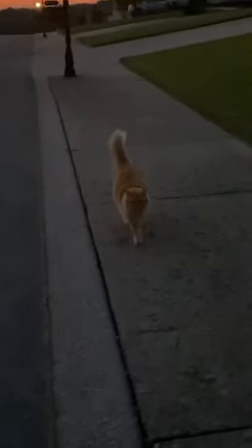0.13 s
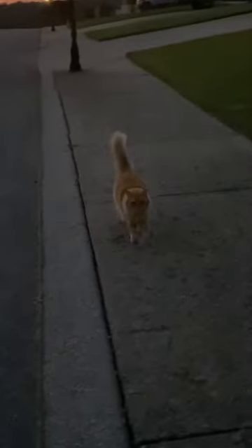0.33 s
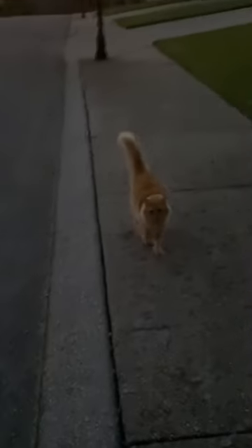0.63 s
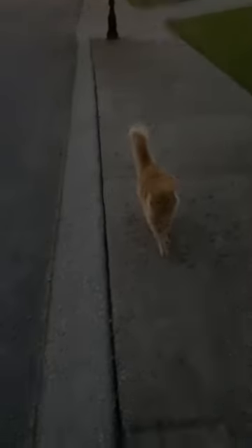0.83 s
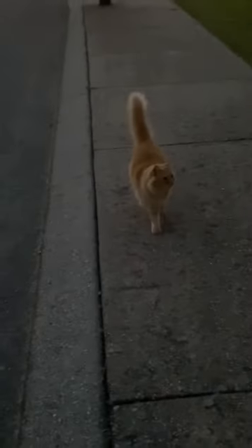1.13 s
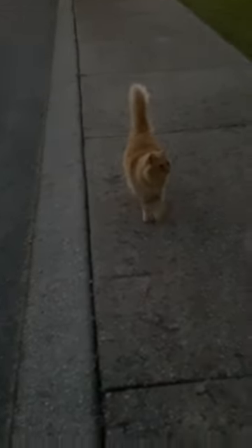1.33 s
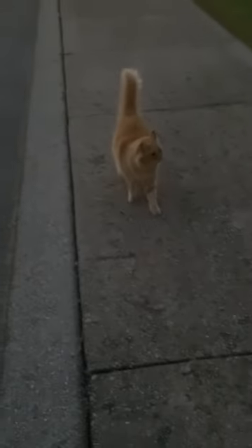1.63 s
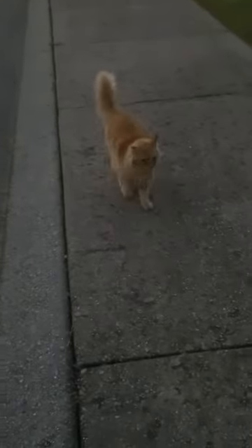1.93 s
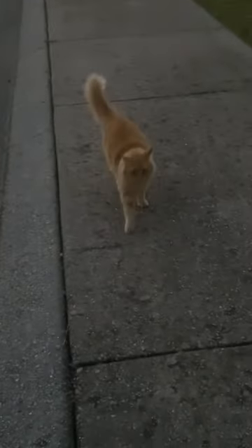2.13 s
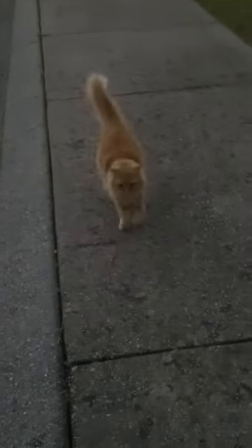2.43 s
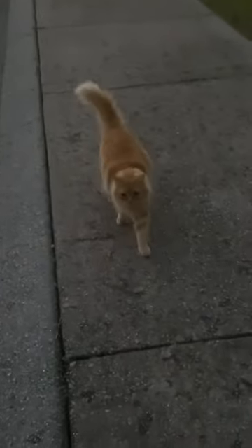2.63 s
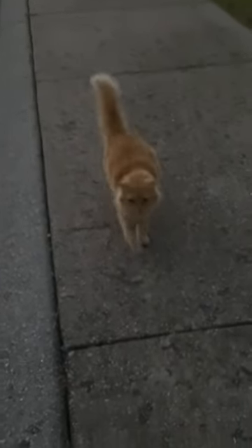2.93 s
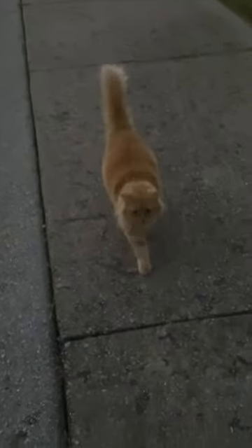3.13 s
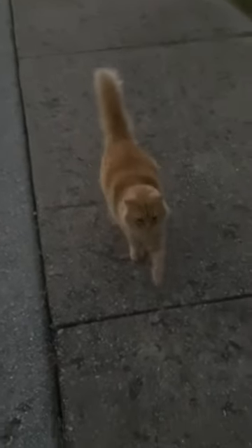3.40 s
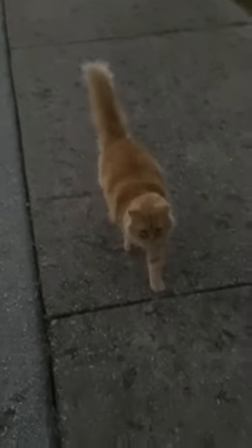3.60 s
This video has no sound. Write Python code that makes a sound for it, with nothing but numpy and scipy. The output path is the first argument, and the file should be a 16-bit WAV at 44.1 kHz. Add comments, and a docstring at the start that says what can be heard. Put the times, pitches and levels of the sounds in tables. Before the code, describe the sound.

On a quiet street, a cat near the microphone meows twice, first briefly, then in a longer call that dulls at the end. Behind it are a low rumble of far traffic, a soft hum and faint high insects.

```python
"""Far traffic rumbles under a mains hum and a steady high insect chorus; two insects rasp in turns.
It is dusk. A cat walks softly up the pavement and meows twice: a short call that rises and falls,
then a long one that closes from "ee-a" to "ow". Its vocal folds make the tone, its moving mouth
shapes the vowels, and the street echoes faintly. A small microphone hears it all through
two openings (ports), one left and one right."""
import sys
import numpy as np
from scipy import signal
from scipy.fft import rfft, irfft
from scipy.io import wavfile

SR = 44100
rng = np.random.default_rng(int(sys.argv[2]) if len(sys.argv) > 2 else 0)


def put_to_file(sound):
    """Save the sound as 16-bit audio at rate SR, in the file named by the first command-line argument."""
    columns = np.atleast_2d(sound).T  # one column per channel
    safe = np.clip(columns, -1, 1)
    whole_steps = np.round(safe * 32767)
    wavfile.write(sys.argv[1], SR, whole_steps.astype(np.int16))


N = 165816
T = np.arange(N) / SR
HZ = np.maximum(np.fft.rfftfreq(N, 1 / SR), 1)

# far traffic, from low to high: f/Hz, level/dB per Hz
TRAFFIC_SPECTRUM = [(20, -97), (32, -84.5), (50, -69), (80, -68.5), (115, -72.5), (160, -75), (220, -74),
                    (290, -80), (400, -84), (560, -92), (750, -102), (1100, -105), (1500, -108),
                    (2000, -114), (3000, -123), (9000, -150)]
# how the traffic rises and falls: t/s, deep rumble gain/dB, upper roar gain/dB
TRAFFIC_GAIN = [(0, -0.5, -2.5), (.7, -1, -1.5), (1.3, 0, 0.5), (1.7, -1, -0.5), (2.2, 0.5, -1.5),
                (2.8, 2, 0.5), (3.3, 1.5, -1), (3.76, 0, 1.5)]
# tones of the mains hum: f/Hz, rms level/dB
HUM_TONES = [(59.5, -63.5), (120, -58.5), (240, -59.5)]
# the insect chorus: f/Hz, level/dB per Hz
CHORUS_SPECTRUM = [(2400, -140), (3100, -123), (3550, -115), (4130, -113), (4450, -123), (5300, -124),
                   (5850, -111), (6300, -105), (6750, -111), (7100, -121), (8100, -123), (8600, -155)]
# air moving at each port: f/Hz, level/dB per Hz
AIR_SPECTRUM = [(30, -102), (70, -96), (170, -102), (400, -95), (700, -105), (1100, -101), (1400, -109),
                (1900, -126), (4000, -132), (8000, -135), (9000, -155)]
# rasps of the higher and the lower insect: start t/s, length/s, level/dB
HIGH_RASPS = [(.06, 0.095, -69.5), (.32, 0.087, -70.5), (.585, 0.094, -74.5), (.87, 0.1, -73.5),
              (1.15, 0.12, -73.5), (1.44, 0.14, -76), (1.77, 0.12, -74.5), (2.05, 0.11, -74),
              (2.33, 0.12, -74.5), (2.61, .11, -74), (2.9, 0.07, -71), (3.19, 0.079, -71),
              (3.48, 0.11, -71)]
LOW_RASPS = [(.09, 0.076, -77), (.37, 0.16, -80), (.6, 0.053, -76), (.8, 0.26, -79), (1.21, 0.084, -81),
             (1.47, 0.2, -80), (1.63, 0.075, -79), (1.84, 0.13, -75), (2.1, 0.091, -85),
             (2.25, 0.14, -76.5), (2.66, .1, -81.5), (2.99, 0.099, -75.5), (3.26, 0.092, -74),
             (3.56, 0.18, -77)]
# paws landing on grit: t/s, level/dB, centre f/Hz, spread/Hz, fade time/s
PAW_STEPS = [(0.459, -80, 3000, 1500, 0.0027), (0.956, -54.5, 800, 376, 0.003),
             (3.68, -68.5, 1510, 1500, 0.041)]
# pitch of each meow: t/s, f/Hz
SHORT_PITCH = [(.688, 556), (.703, 581.5), (.725, 612), (.78, 623), (.825, 643), (.84, 647), (.88, 637),
               (.96, 605.6), (1.0, 587), (1.11, 550)]
LONG_PITCH = [(2.69, 495), (2.728, 551), (2.764, 600.4), (2.862, 610.6), (2.95, 589.7), (3.002, 597),
              (3.1, 581.8), (3.19, 597.1), (3.27, 576), (3.346, 557.4), (3.46, 582.7), (3.526, 562),
              (3.615, 544), (3.64, 607)]
# effort and mouth shape: t/s, level/dB before shaping, first resonance f/Hz, second resonance f/Hz
SHORT_MOUTH = [(0.691, -78, 2065, 3160), (.73, -74.5, 2110, 3550), (.77, -75, 2200, 3400),
               (.84, -69, 2116, 3370), (.91, -72, 2120, 3254), (.98, -76, 1810, 3130),
               (1.019, -87, 1630, 3040), (1.11, -76, 1352, 3000)]
LONG_MOUTH = [(2.691, -87.5, 1037, 2880), (2.73, -74.5, 1640, 2930), (2.78, -72.5, 2050, 3310),
              (2.86, -69.5, 2267, 3295), (2.98, -67.5, 2120, 3200), (3.08, -67, 1940, 2980),
              (3.161, -66, 1750, 2860), (3.23, -67, 1515, 2880), (3.33, -67.5, 1087, 2427),
              (3.45, -67.5, 1089, 2380), (3.51, -77, 1020, 2320), (3.56, -73.5, 970, 2400),
              (3.629, -76, 1000, 2500)]
# tone colour of each meow on its way to the microphone, as the head turns: f/Hz, gain/dB
SHORT_COLOUR = [(620, 5.5), (1250, 0.5), (1900, -5.5), (2500, -7), (3150, -2), (3750, 5), (4400, 10),
                (5200, 24.5), (5800, 22), (6500, 34), (7300, 14.5), (8300, 10), (9500, -7)]
LONG_COLOUR = [(600, 0), (1200, 5), (1800, -9), (2400, 2.5), (3000, -7), (3600, 5), (4250, 12), (4750, 12),
               (5300, 23.5), (6000, 17), (6650, 29.5), (7400, 16.5), (8200, 19.5), (9000, 19.5),
               (11000, 13.5)]
# moments when the voice catches: t/s, width/s, extra wobble/share of the pitch
VOICE_CATCHES = [(0.693, 0.011, .028), (0.837, 0.01, 0.014), (2.948, 0.0033, 0.014), (3.37, 0.055, .004),
                 (3.58, .05, .006)]
# echoes from the street: delay/s, gain/dB
STREET_ECHOES = [(.031, -31), (.074, -19.5), (.128, -39)]
# how far the left port is ahead of the right: f/Hz, phase/rad
PORT_PHASE = [(60, 0), (170, -.07), (300, -.27), (450, -.65), (650, -1.1), (850, -1.0), (1100, -.15),
              (1500, 0), (2000, .1), (2500, 1.05), (3000, .8), (3300, .35), (4200, .6), (4550, 1.3),
              (4870, 3.14), (5200, 6.0), (6000, 6.9), (8000, 7.85)]
# how much louder the left port is than the right: f/Hz, level/dB
PORT_BALANCE = [(100, .1), (200, .4), (350, 1.4), (700, -.5), (1150, -2.2), (1700, -.2), (8000, 0)]


def from_db(db):
    """Turn decibels into a number to multiply by."""
    return 10 ** (np.asarray(db) / 20)


def in_time(rows):
    """Join a table's rows with straight lines: one curve in time for each value column."""
    times, *columns = np.transpose(rows)
    return [np.interp(T, times, column) for column in columns]


def at_hz(points, hz):
    """Read a table at any frequency, with octaves evenly spaced."""
    f, value = np.transpose(points)
    return np.interp(np.log(hz), np.log(f), value)


def band(centre_hz, spread_hz):
    """Noise in a bell-shaped band around one frequency, of typical size (rms) 1."""
    bell = np.exp(-.5 * ((HZ - centre_hz) / spread_hz) ** 2)
    x = irfft(rfft(rng.standard_normal(N)) * bell, N)
    return x / x.std()


def drift(rate_hz):
    """A random wander of typical size 1; a higher rate wanders faster."""
    return band(0, rate_hz)


def noise(spectrum):
    """Noise with the given dB per Hz."""
    return irfft(rfft(rng.standard_normal(N)) * from_db(at_hz(spectrum, HZ)), N) * np.sqrt(SR / 2)


def traffic(split_hz=140, swell_db=.78):
    """Far traffic grows slowly: deep rumble below the split, the upper roar (a low drone) above it."""
    rumble_db, upper_db = in_time(TRAFFIC_GAIN)
    whole = noise(TRAFFIC_SPECTRUM) * from_db(swell_db * drift(3.7))
    rumble = irfft(rfft(whole) / (1 + (HZ / split_hz) ** 4), N)
    return rumble * from_db(rumble_db) + (whole - rumble) * from_db(upper_db)


def mains_hum(waver_db=1.5):
    """Mains power hums with three low tones, each wavering a little."""
    hum = np.zeros(N)
    for hz, db in HUM_TONES:
        peak = np.sqrt(2) * from_db(db + waver_db * drift(3.4))
        hum += peak * np.sin(2 * np.pi * hz * T + .66 * drift(3))
    return hum


def insect_chorus(flicker_db=2.5):
    """Many insects blend into one high, flickering hiss."""
    return noise(CHORUS_SPECTRUM) * from_db(flicker_db * drift(10))


def port_air():
    """Moving air gives each port a soft rush of its own."""
    return np.array([noise(AIR_SPECTRUM), noise(AIR_SPECTRUM)])


def insect(rasps, centre_hz, spread_hz, stroke_hz=76.3, stroke_depth=.41, rise_s=.025, fade_s=.055):
    """Each rasp is a quick run of wing strokes on one narrow resonance, dying away in the trees."""
    loudness = np.zeros(N)
    for start, length, db in rasps:
        rise = np.clip((T - start) / rise_s, 0, 1)
        fade = np.exp(-np.maximum(T - start - length + rise_s, 0) / fade_s)
        loudness += from_db(db) * rise * fade
    stroke_rate = stroke_hz * (1 + .05 * drift(7.5))
    strokes = 1 + stroke_depth * np.sin(2 * np.pi * np.cumsum(stroke_rate) / SR)
    return loudness * strokes * band(centre_hz, spread_hz)


def footfalls(rise_s=.00092):
    """Soft paws scuff the grit, each in a short, dull burst of noise."""
    steps = np.zeros(N)
    for t, db, hz, spread_hz, fade_s in PAW_STEPS:
        rise = np.clip((T - t) / rise_s + 1, 0, 1) ** 2
        fade = np.exp(-np.maximum(T - t, 0) / fade_s)
        steps += from_db(db) * band(hz, spread_hz) * rise * fade
    return steps


def resonance(hz, centre_hz, width_hz):
    """The air in the mouth boosts tones near centre_hz and shifts their phase."""
    return 1 / (1 - (hz / centre_hz) ** 2 + 1j * hz * width_hz / centre_hz ** 2)


def meow(pitch_curve, mouth_curve, colour, lips_close_s, muffle_db_per_octave_s,
         harmonics=19, jitter=.0025, breath_db=-28, muffle_hz=1200, rise_s=.005, fall_s=.0096):
    """The vocal folds buzz; two moving mouth resonances shape the buzz and the closing lips dull it."""
    start, end = pitch_curve[0][0], pitch_curve[-1][0]
    calling = (T > start) & (T < end)
    pitch, level_db, first_hz, second_hz = [
        curve[calling] for curve in in_time(pitch_curve) + in_time(mouth_curve)]
    catches = sum(share * np.exp(-.5 * ((T - t) / width) ** 2) for t, width, share in VOICE_CATCHES)
    wobble = (jitter * drift(69) + catches * drift(270))[calling]
    phase = 2 * np.pi * np.cumsum(pitch * (1 + wobble)) / SR
    lost_db_per_octave = muffle_db_per_octave_s * np.maximum(T[calling] - lips_close_s, 0)
    shimmer_db = 1.41 * drift(8.4) + .5 * drift(4)  # a quick tremble and a slower swell
    breath = from_db(breath_db) * drift(220)
    voice = np.zeros(N)
    for k in range(1, harmonics + 1):  # harmonics are tones at whole multiples of the pitch
        hz = k * pitch
        shift = k * N // harmonics  # gives each harmonic its own shimmer and rasp
        own_db = np.roll(shimmer_db, shift)[calling]
        rasp = 1 + np.roll(breath, shift)[calling]
        mouth = resonance(hz, first_hz, width_hz=112) * resonance(hz, second_hz, width_hz=122)
        muffle_db = lost_db_per_octave * np.maximum(np.log2(hz / muffle_hz), 0)
        gain = from_db(level_db + at_hz(colour, hz) + own_db - muffle_db)
        voice[calling] += gain * rasp * np.real(mouth * np.exp(1j * k * phase))
    return voice * np.clip((T - start) / rise_s, 0, 1) * np.clip((end - T) / fall_s, 0, 1)


def street(x, tail_db=-23.5, tail_s=.61):
    """The street adds a few faint echoes and a thin tail that drops 60 dB in tail_s."""
    tail = rng.standard_normal(N) * from_db(-60 * T / tail_s)
    reverb = signal.fftconvolve(x, tail / np.linalg.norm(tail))[:N]
    echoes = sum(from_db(db) * np.interp(T - delay, T, x) for delay, db in STREET_ECHOES)
    return x + from_db(tail_db) * reverb + echoes


def ports(x):
    """The two ports hear one sound, each with its own phase and level."""
    left = np.exp(.5j * at_hz(PORT_PHASE, HZ)) * from_db(at_hz(PORT_BALANCE, HZ) / 2)
    return irfft(rfft(x) * np.array([left, 1 / left]), N)


def scene():
    """The cat in front, the evening around it."""
    short_call = meow(SHORT_PITCH, SHORT_MOUTH, SHORT_COLOUR,
                      lips_close_s=.96, muffle_db_per_octave_s=120)
    long_call = meow(LONG_PITCH, LONG_MOUTH, LONG_COLOUR,
                     lips_close_s=3.464, muffle_db_per_octave_s=65)
    cat = street(short_call + long_call)
    high_insect = insect(HIGH_RASPS, centre_hz=7888, spread_hz=153)
    low_insect = insect(LOW_RASPS, centre_hz=7504, spread_hz=210)
    steps = footfalls()
    evening = traffic() + mains_hum() + insect_chorus()
    return ports(evening + high_insect + low_insect + steps + cat) + port_air()


def record(dry, cutoff_hz=11500):
    """The highest treble is cut steeply; the sound eases in and out over two milliseconds."""
    ease = np.clip(np.minimum(T, T[-1] - T) / .002, 0, 1)
    treble_cut = signal.ellip(10, .1, 70, cutoff_hz, fs=SR, output="sos")
    return signal.sosfilt(treble_cut, dry * ease)


dry = scene()
out = record(dry)
put_to_file(out)
```